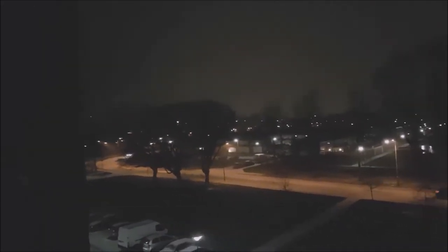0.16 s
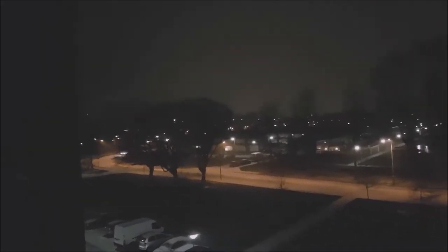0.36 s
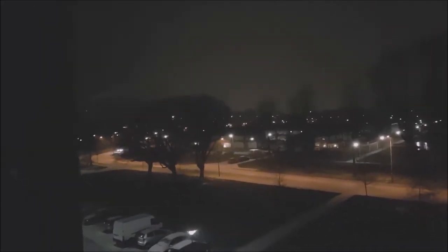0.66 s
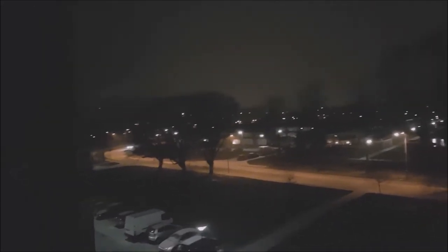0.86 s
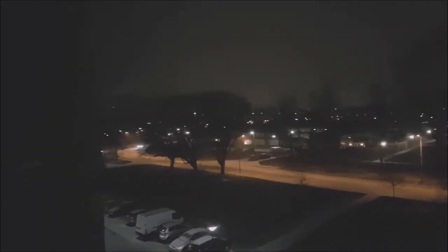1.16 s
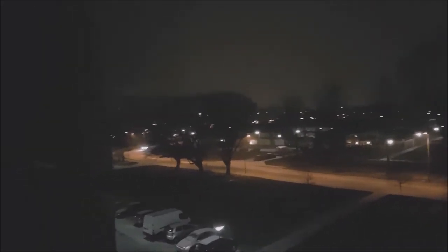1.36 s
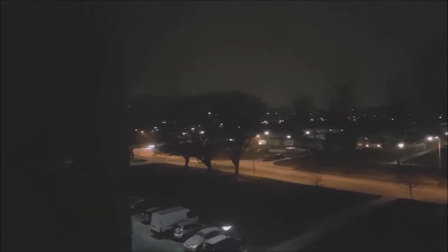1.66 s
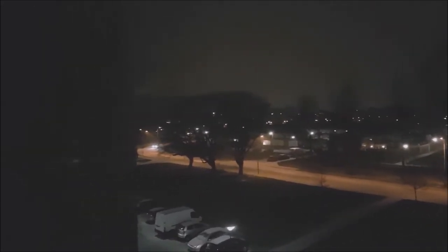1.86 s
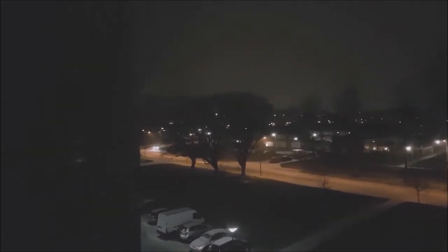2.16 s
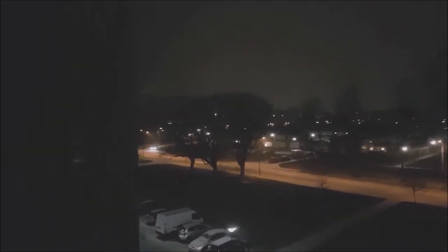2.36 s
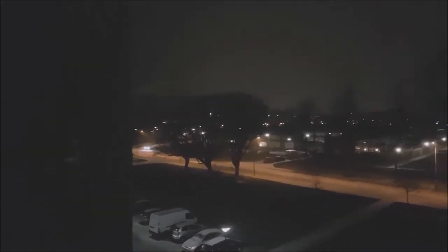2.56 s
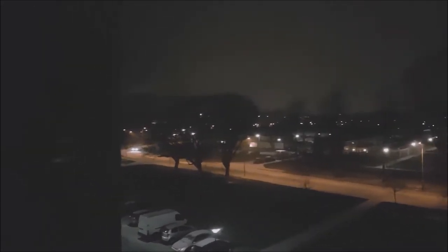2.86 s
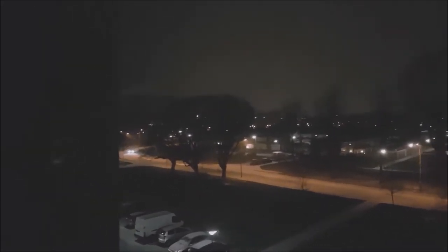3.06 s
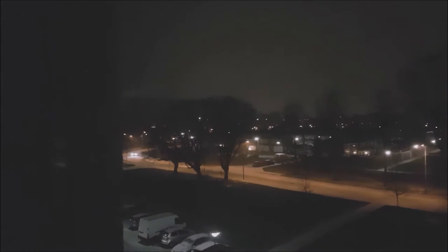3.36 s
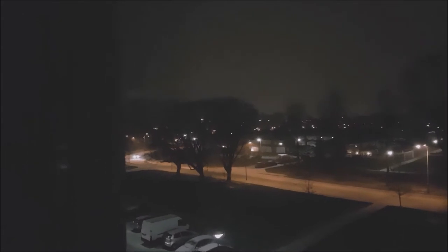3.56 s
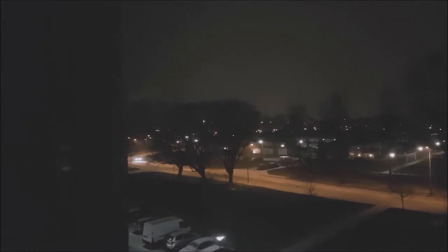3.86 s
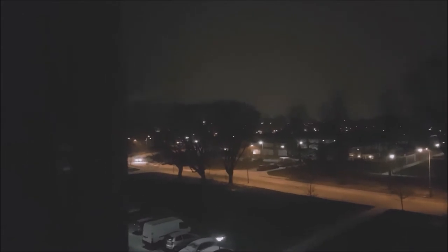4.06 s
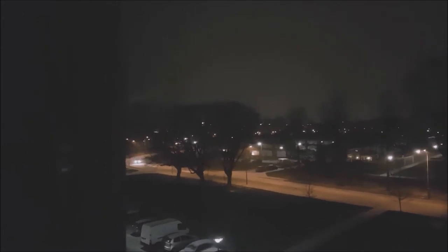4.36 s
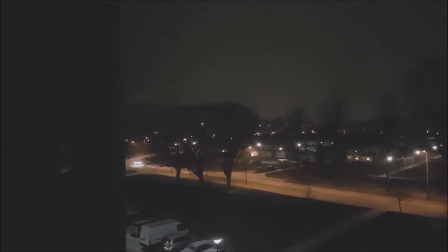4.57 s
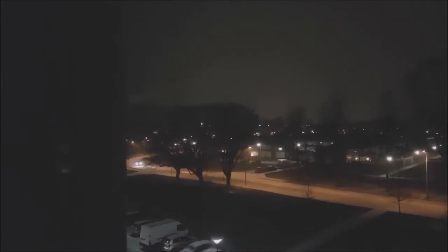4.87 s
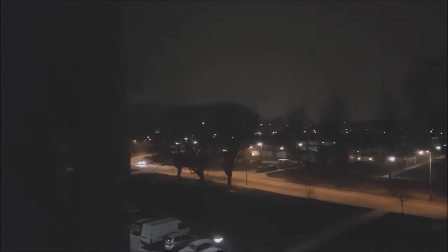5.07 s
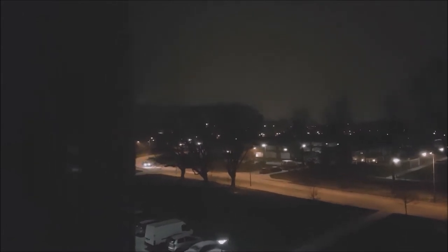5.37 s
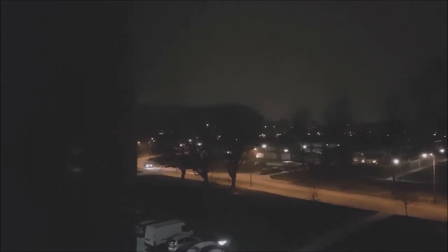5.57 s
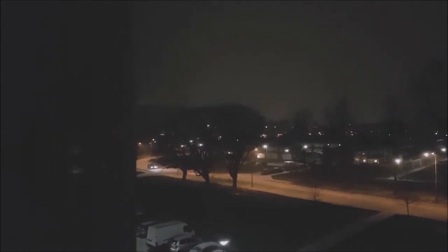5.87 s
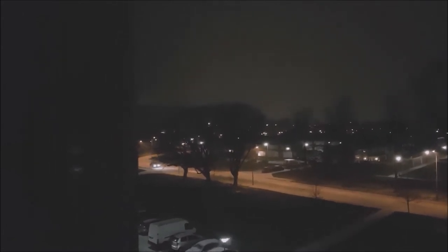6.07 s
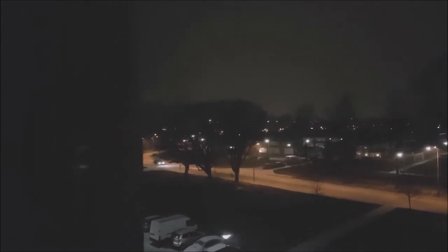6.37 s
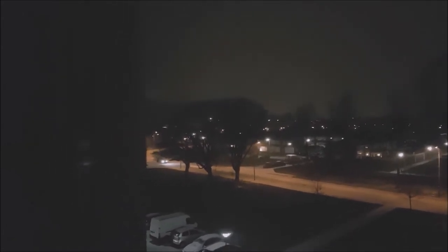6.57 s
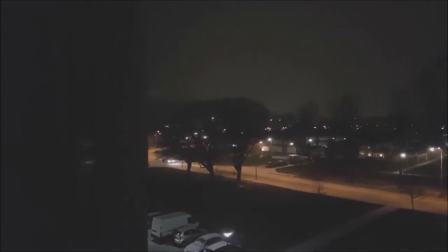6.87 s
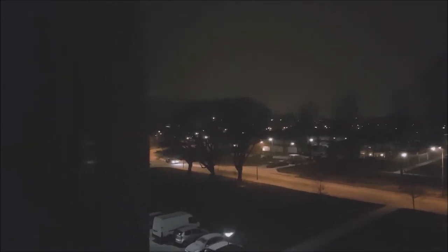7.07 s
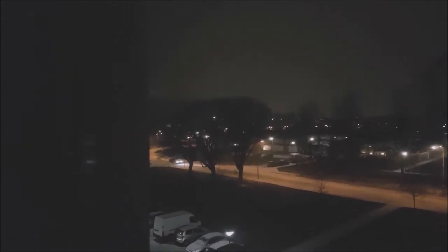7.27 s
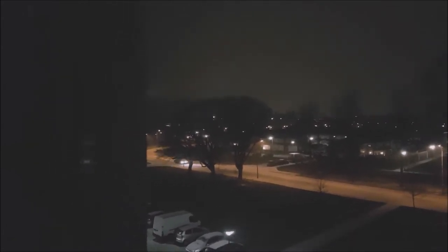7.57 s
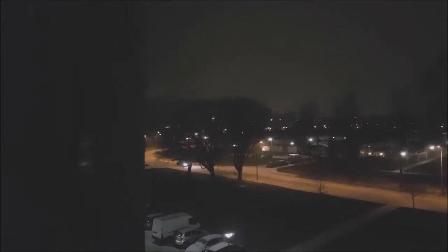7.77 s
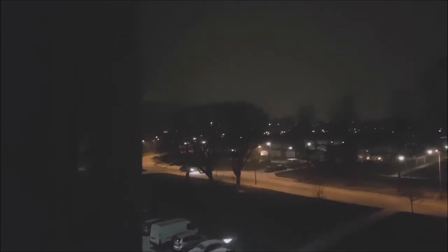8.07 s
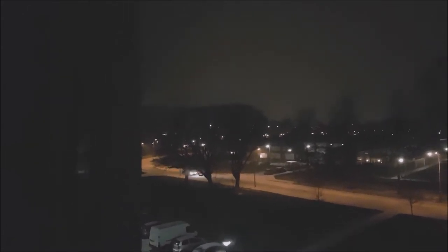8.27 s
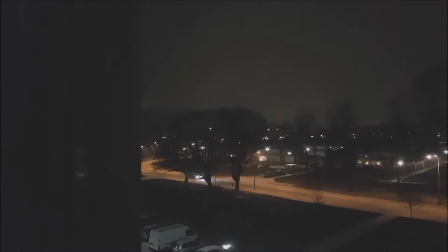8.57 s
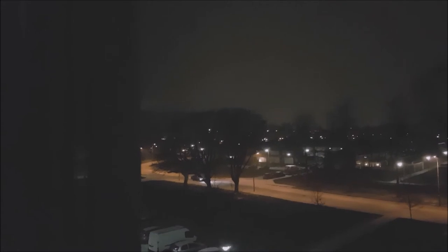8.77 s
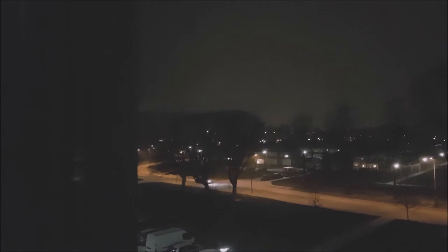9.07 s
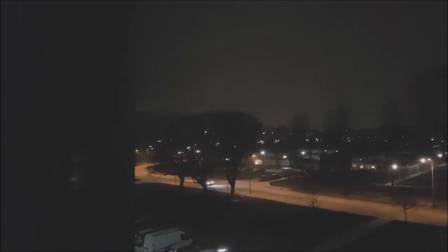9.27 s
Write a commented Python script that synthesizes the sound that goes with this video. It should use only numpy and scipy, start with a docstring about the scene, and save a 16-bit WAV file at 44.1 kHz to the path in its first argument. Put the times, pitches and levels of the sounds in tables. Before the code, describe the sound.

From a window at night, ripping thunder breaks into booming cracks and bright snaps, then rumbles away slowly with a late clap.

```python
"""Thunder over a town at night, heard from a window on a phone held in the hand.
A tearing lead-in opens into a loud peal that ends in sharp snaps, then a long roll with one late clap.
Swarms of shocks from the crooked lightning channel, single fronts and low thuds boom in the room.
Shaped noise makes the distant traffic, tyres and hiss underneath.
A finger muffles the right port throughout, with dull bumps in the first few seconds."""
import sys
import numpy as np
from scipy import signal
from scipy.fft import rfft, irfft, next_fast_len
from scipy.io import wavfile
from scipy.ndimage import uniform_filter1d, minimum_filter1d, map_coordinates

SR = 44100
rng = np.random.default_rng(int(sys.argv[2]) if len(sys.argv) > 2 else 0)


def master_out(mix):
    """Clip the mix to full scale and print it as 16-bit PCM to the path in sys.argv[1]."""
    frames = np.transpose(np.atleast_2d(mix))
    ceiling = np.clip(frames, -1, 1)
    pcm = np.round(ceiling * 32767).astype(np.int16)
    wavfile.write(sys.argv[1], SR, pcm)


N = 414981

# Spectrum tables list freq_hz, level_db (per hertz, relative: the sound is levelled afterwards).
# Distant traffic: spectrum
TRAFFIC_SPECTRUM = [(30, -9.5), (130, -1), (430, -0.5), (620, -11.5), (780, -10.5), (950, -8), (1450, -20),
                    (2000, -17), (2600, -26.5), (3500, -32), (4300, -35.5), (7000, -62), (12000, -59.5)]
# Tyres singing on the road: spectrum, then level over time: time_s, level_db
TYRE_SPECTRUM = [(1000, -30), (1600, -10.5), (1950, 7), (2250, -0.5), (2700, -15.5), (4500, -44.5)]
TYRE_LEVEL = [(0, -72), (4.3, -69), (5.8, -60.5), (7.7, -66), (7.9, -56.5), (8.4, -63), (8.9, -58),
              (9.22, -57), (9.41, -65)]
# Faint treble hiss: spectrum, then level over time: time_s, level_db
HISS_SPECTRUM = [(1000, -24), (2500, -8), (5000, 1.5), (7800, -4.5), (9000, -17), (16000, -28.5)]
HISS_LEVEL = [(0, -82), (2.1, -80), (2.3, -70), (3.4, -67), (4.9, -68), (6.3, -79), (9.41, -82)]
# Self-noise of the microphones: spectrum
MIC_SPECTRUM = [(100, 1), (3000, -1), (6000, -5), (9500, -13), (12500, -4), (15700, 0)]

# Finger shifting on the right port: start_s, thump_db, pitch_hz, tick_db
BUMPS = [(0.106, -25, 170, -38), (.176, -11, 150, -40), (.51, -9.5, 50.3, -41), (1.119, -14.5, 40, -53),
         (1.319, -22, 45, -59), (1.492, -11.5, 44.8, -47.5), (2.09, -17, 45, -57), (2.622, -19, 40, -69),
         (3.288, -17, 45, -68), (3.47, -20, 45, -63), (4.058, -14, 50.2, -71), (3.769, -12, 128, -41.5)]
# Finger grips, each held until the next: start_s, loss_db
GRIPS = [(0, 22), (.8, 27.5), (2.1, 24), (3.65, 17)]
REGRIP_S = 0.097  # time to slide into a new grip
# Tone of the covered port, where bass slips past the finger: freq_hz, gain_db
LEAK_TONE = [(30, 18.5), (60, 9), (110, 4.5), (200, 2), (380, -4.5), (1400, -3.5), (2500, 4), (6000, 4)]

# Scatter after each strong front: freq_hz, t60_s
SCATTER_DECAY = [(60, 0.32), (200, 0.21), (1000, 0.063), (3000, 0.17), (10000, 0.029)]
# Near walls: delay_s, gain (linear)
WALLS = [(.0096, 0.16), (.026, 0.27), (0.0427, .15)]
# Standing waves of the room: freq_hz, width_hz, level_db (over the direct sound)
ROOM_MODES = [(58.8, 3.7, 3.5), (118.3, 13, -8), (133.2, 11, -4), (198.5, 5.2, 5.5), (258.6, 7.6, 0.5)]

# Peals, one for each bend of the channel that is heard: start_s, hold_s, boom_db, tear_db
PEALS = [(0, 0.38, -42, -36.5), (0.423, 0.2, -35, -33), (0.839, 0.045, -24, -29),
         (0.904, 0.082, -24.5, -27.5), (1.132, 0.15, -14, -23), (1.316, 0.12, -14.5, -24),
         (1.523, 0.034, -15.5, -24), (1.607, 0.18, -15.5, -25), (1.866, 0.11, -20.5, -32),
         (2.037, 0.1, -16.5, -24.5), (2.214, 0.044, -17.5, -26.5), (2.424, 0.087, -29, -35),
         (2.86, 0.093, -39, -39.5), (2.97, 0.22, -32, -37), (3.267, 0.13, -29, -35),
         (3.513, 0.35, -38.5, -39.5), (3.77, 0.36, -33.5, -47), (4.175, 0.043, -37, -43),
         (4.43, 0.14, -31, -41), (4.739, 0.11, -33.5, -40), (4.952, 0.17, -42, -38.5),
         (5.651, 0.099, -29.5, -39.5), (5.788, 0.044, -31.5, -38.5), (5.97, 0.26, -36, -40.5),
         (6.186, 0.19, -36.5, -58), (6.91, 0.07, -31.5, -53), (7.076, 0.076, -25.5, -37),
         (7.214, 0.078, -31.5, -45), (7.315, 0.015, -29.5, -37), (7.832, 0.081, -35, -37.5),
         (8.183, 0.24, -38.5, -42), (9.211, 0.1, -36, -47)]
ATTACK_S = 0.04  # length of the rise, centred on start_s
BOOM_FALL_DB_PER_S, TEAR_FALL_DB_PER_S = 73.5, 74
# Steady rumble and tearing between the peals: start_db, fade_db_per_s
BOOM_BED = (-32.5, 0.87)
TEAR_BED = (-40.5, .9)
# Deep boom, near tearing and duller far tearing: spectra
BOOM_SPECTRUM = [(15, -54.5), (30, -37.5), (48, -8.5), (63, -1.5), (76, -3), (105, -2.5), (140, 0),
                 (170, -2), (200, -5.5), (250, -10.5), (310, -13.5), (450, -23.5), (650, -32.5),
                 (2000, -97)]
NEAR_TEAR_SPECTRUM = [(150, -16), (330, -1.5), (480, 2.5), (600, 1.5), (780, 3), (1000, 4), (1200, -2),
                      (1600, -8), (2150, -16.5), (2700, -35.5), (4000, -44.5), (6000, -70), (16000, -89)]
FAR_TEAR_SPECTRUM = [(120, -21), (290, 1.5), (480, 9), (600, -10.5), (750, -2), (1000, -22), (1600, -38),
                     (2700, -30), (8000, -96.5)]
# Later shocks come from farther up the channel, so the tearing turns dull
DULL_FROM_S, DULL_TIME_S = 0.57, 3.14  # onset and time constant

# Fronts so distant that only a round thud is left: start_s, level_db (envelope peak, before the room), pitch_hz
THUDS = [(0.811, -17, 149.4), (.922, -17, 176.5), (1.143, -8.5, 126), (1.197, -8, 107), (1.355, -11, 139.3),
         (1.66, -8, 106.6), (1.684, -4.5, 128), (2.066, -12, 153), (2.111, -8.5, 145), (2.261, -6, 134),
         (2.393, -15, 140), (2.496, -12.5, 124), (2.538, -12, 129.5), (2.95, -20, 146), (3.071, -17.5, 180),
         (3.294, -17.5, 111), (3.338, -20.5, 146), (4.059, -24, 191), (4.078, -18, 264),
         (4.222, -16.5, 187), (4.456, -32, 156), (5.293, -25, 213), (5.686, -29, 111), (5.831, -17, 176),
         (5.869, -16.5, 178), (6.129, -22.5, 145), (6.34, -24, 116), (7.02, -15.5, 116), (7.073, -18, 182),
         (7.338, -15, 117), (7.713, -25.5, 124), (8.431, -27.5, 139), (9.305, -30.5, 156)]
THUD_SWELL_S = 0.005
# Single strong fronts: start_s, level_db (left peak before the room), pitch_hz (low when blunt and far)
CLAPS = [(0.103, -18.5, 950), (.404, -16, 1030), (.563, -18, 887), (0.636, -15.5, 1010),
         (0.716, -12.5, 870), (0.815, -9, 845), (.883, -14.5, 890), (1.138, -7.5, 1237), (1.157, -21, 1440),
         (1.188, -7.5, 895), (1.225, -8.5, 740), (1.322, -2.5, 1086), (1.344, -15, 1360),
         (1.405, -11.5, 1230), (1.558, -19.5, 1237), (1.595, -6.5, 950), (1.616, -13.5, 1460),
         (1.653, -14, 1260), (1.767, -5.5, 763), (1.881, -15, 700), (2.066, -10.5, 1034), (2.122, -6, 590),
         (2.1638, -6.5, 480), (2.26, -2.5, 1230), (2.852, -23, 864), (3.193, -18.5, 726),
         (3.294, -11.5, 550), (3.379, -17, 790), (3.499, -19, 507), (3.686, -24, 556), (3.891, -18, 724),
         (3.989, -18.5, 660), (4.056, -17.5, 720), (4.602, -28, 476), (4.952, -24, 900), (5.46, -21, 517),
         (5.637, -26.5, 554), (5.841, -24.5, 410), (6.234, -28, 400), (6.354, -25.5, 513), (6.39, -22, 486),
         (6.45, -27, 480), (6.903, -19, 462), (7.0696, -8, 940), (7.08, -16, 1100), (7.101, -22, 1130),
         (7.888, -19.5, 410), (8.84, -27.5, 413), (9.304, -21, 344)]
# Fixed bass of a strong front: freq_hz, level_db
FRONT_BASS = [(25, -22), (55, -7), (95, 0)]
# Top of a strong front, which moves with its pitch: pitch_multiple (ratio), level_db
FRONT_TOP = [(.45, 1.5), (.7, -2.5), (1, 3), (1.35, -8.5), (2.1, -18.5), (2.8, -34.5), (4, -52.5),
             (6, -69.5), (15, -88.5)]
# Crackle bursts as the sharpest fronts splinter: start_s, level_db (at the start)
SPLINTERS = [(1.139, -41), (1.157, -41.5), (1.322, -42), (1.343, -38.5), (1.406, -37), (1.613, -31),
             (1.651, -42.5), (2.259, -35)]
SPLINTER_FALL_DB_PER_S = 478
# Splinter crackle: spectrum
SPLINTER_SPECTRUM = [(600, -31.5), (1400, -7), (2100, 9.5), (2800, -9), (4200, -18.5), (5000, -34),
                     (9000, -49.5)]
# Dry snaps close by: start_s, level_db, pitch_hz
SNAPS = [(1.225, -25, 3240), (2.077, -33.5, 2970), (2.15, -25.5, 3010), (2.161, -29.5, 3240),
         (2.1657, -20.5, 2720), (2.1909, 0, 2250), (2.206, 4.5, 2130), (2.2069, -4.5, 6800),
         (2.2153, -12.5, 9070), (2.233, -28, 7030)]
# What the snaps leave ringing: spectrum
SNAP_RING_SPECTRUM = [(600, -21), (1500, 2.5), (2200, 2.5), (3100, -2.5), (4200, -30.5), (7500, -18),
                      (10000, -30.5), (16000, -37.5)]
# Flurries of fine crackle around the snaps: peak_s, level_db (at the peak)
FLURRIES = [(2.164, -32.5), (2.206, -47)]
FLURRY_RISE_DB_PER_S, FLURRY_FALL_DB_PER_S = 745, 1400
# Flurry crackle: spectrum
SPARK_SPECTRUM = [(500, -32.5), (1400, -1.5), (2200, 6), (3200, -3), (4300, -4.5), (7000, -12),
                  (9000, -34.5), (16000, -38)]
# Band limit of the phone, in hertz
TOP_HZ = 15850


def amp(db):
    """Decibels to linear gain."""
    return 10 ** (np.asarray(db) / 20)


def unit(x):
    """Scale a sound to an rms of 1."""
    return x / np.sqrt(np.mean(x ** 2) + 1e-20)


def along(points, hz):
    """Read (Hz, value) points along a log frequency axis."""
    point_hz, values = np.transpose(points)
    return np.interp(np.log(hz + 1), np.log(point_hz + 1), values)


def level_curve(points):
    """Draw straight lines through (s, dB) points, one value per sample."""
    times, levels = np.transpose(points)
    return np.interp(np.arange(N) / SR, times, levels)


def wobble(rate_hz):
    """A smooth random curve with rate_hz knots a second."""
    knots = rng.standard_normal(int(N * rate_hz / SR) + 4)
    return map_coordinates(knots, [np.arange(N) * rate_hz / SR])


def coloured(x, spectrum):
    """Causal minimum-phase filter through (Hz, dB) points, built by folding the cepstrum."""
    n = x.shape[-1]
    m = 2 * next_fast_len(n // 2 + SR // 8)
    gain = amp(along(spectrum, np.fft.rfftfreq(m, 1 / SR)))
    cepstrum = irfft(np.log(gain))
    cepstrum[1:m // 2] *= 2
    cepstrum[m // 2 + 1:] = 0
    response = np.exp(rfft(cepstrum))
    return irfft(rfft(x, m) * response, m)[..., :n]


def noise(spectrum):
    """Coloured noise of rms 1, unrelated in the two channels."""
    return unit(coloured(rng.standard_normal((2, N)), spectrum))


def add(track, s, sound):
    """Mix a sound in at time s."""
    part = track[..., max(round(s * SR), 0):][..., :sound.shape[-1]]
    part += sound[..., :part.shape[-1]]


def town(waver_db=-1.5):
    """Steady distant traffic, the wavering song of tyres and a faint hiss that swells and sinks."""
    traffic = amp(-41.0) * noise(TRAFFIC_SPECTRUM)
    tyre_gain = amp(level_curve(TYRE_LEVEL) + waver_db * wobble(2.3))
    tyres = tyre_gain * noise(TYRE_SPECTRUM)
    hiss = amp(level_curve(HISS_LEVEL)) * noise(HISS_SPECTRUM)
    return traffic + tyres + hiss


def finger(life_cycles=0.53, settle_db_per_s=1.4, flutter_db=-39, waver_db=2.0):
    """Dull bumps with a tick of skin contact, and a low flutter that calms as the hand settles."""
    out, t = np.zeros(N), np.arange(SR // 5) / SR
    tick_spectrum = [(1000, 23), (3500, 7.5), (6000, -7.5), (15000, -21)]
    for s, thump_db, hz, tick_db in BUMPS:
        thump = np.sin(2 * np.pi * hz * t) * np.exp(-hz * t / life_cycles)
        burst = rng.standard_normal(len(t)) * amp(-60 * t / 0.0075)  # t60 7.5 ms
        tick = coloured(burst, tick_spectrum)
        add(out, s, amp(thump_db) * thump + amp(tick_db) * tick)
    flutter = noise([(10, -14.5), (25, -6.0), (55, 2.0), (120, -15.0), (500, -37.5), (3000, -90.5)])[1]
    settling_db = flutter_db - settle_db_per_s * np.arange(N) / SR
    return out + flutter * amp(settling_db + waver_db * wobble(3.9))


def seal():
    """Gain of the covered port as the finger slides from grip to grip."""
    starts, loss_db = np.transpose(GRIPS)
    held = loss_db[np.searchsorted(starts[1:], np.arange(N) / SR)]
    return amp(-uniform_filter1d(held, size=max(round(REGRIP_S * SR), 1)))


def room(x):
    """Near walls repeat every shock, and a few standing waves ring on."""
    m = next_fast_len(N + SR // 2)
    f = np.fft.rfftfreq(m, 1 / SR)
    echoes = sum(gain * np.exp(-2j * np.pi * f * delay) for delay, gain in WALLS)
    ring = sum(amp(db) * 1j * f * width / (hz * hz - f * f + 1j * f * width)
               for hz, width, db in ROOM_MODES)
    return irfft(rfft(x, m) * (1 + echoes + ring), m)[:, :N]


def swarm(spectrum, rate_hz, spread_db, wash_db):
    """Small shocks at random times and sizes, over the diffuse wash of their echoes; rms 1."""
    sizes = rng.choice([-1, 1], N) * amp(spread_db * rng.uniform(-0.36, 1, N))
    shocks = unit(sizes * (rng.random(N) < rate_hz / SR))
    wash = amp(wash_db) * rng.standard_normal((2, N))
    return unit(coloured(shocks + wash, spectrum))


def swell(s, hold_s, fall_db_per_s):
    """Gain of one peal: a quick rise, a hold, then a steady fall in dB."""
    t = np.arange(N) / SR - s
    rise = np.clip(t / ATTACK_S + .5, 0, 1)
    return rise * amp(-fall_db_per_s * np.maximum(t - hold_s, 0))


def strength(bed, peals, fall_db_per_s):
    """Gain in which the fading bed and the (s, hold s, dB) peals add up in power."""
    start_db, fade_db_per_s = bed
    bed_power = amp(start_db - fade_db_per_s * np.arange(N) / SR) ** 2
    peal_power = sum((amp(db) * swell(s, hold_s, fall_db_per_s)) ** 2 for s, hold_s, db in peals)
    return np.sqrt(bed_power + peal_power)


def roll(surge_db=1.63):
    """Deep boom and tearing surge together as bends of the channel are heard in turn."""
    boom_peals = [(s, hold, db) for s, hold, db, _ in PEALS]
    tear_peals = [(s, hold, db) for s, hold, _, db in PEALS]
    boom_gain = strength(BOOM_BED, boom_peals, BOOM_FALL_DB_PER_S)
    tear_gain = strength(TEAR_BED, tear_peals, TEAR_FALL_DB_PER_S)
    boom = swarm(BOOM_SPECTRUM, rate_hz=330, spread_db=4, wash_db=-0.5)
    near = swarm(NEAR_TEAR_SPECTRUM, rate_hz=200, spread_db=6, wash_db=0)
    far = swarm(FAR_TEAR_SPECTRUM, rate_hz=140, spread_db=12.5, wash_db=-1)
    # equal-power crossfade from near to far
    near_share = np.exp(-np.maximum(np.arange(N) / SR - DULL_FROM_S, 0) / DULL_TIME_S)
    tear = np.sqrt(near_share) * near + np.sqrt(1 - near_share) * far
    return boom_gain * boom + tear_gain * amp(surge_db * wobble(17)) * tear


def thuds():
    """Each distant front is a few low cycles that swell and sink."""
    out, t = np.zeros((2, N)), np.arange(SR // 8) / SR
    shape = t / THUD_SWELL_S * np.exp(1 - t / THUD_SWELL_S)
    for s, db, hz in THUDS:
        add(out, s, amp(db) * np.sin(2 * np.pi * hz * t) * shape)
    return out


def arrival(wet_db):
    """One shock at both ports: the direct spike, then a fresh scatter from facades and walls."""
    hz, t, z = signal.stft(rng.standard_normal((2, SR // 3)), SR, nperseg=256)
    decay = amp(-60 * t / along(SCATTER_DECAY, hz)[:, None])
    shock = signal.istft(z * decay, SR, nperseg=256)[1]
    shock *= amp(wet_db) / np.linalg.norm(shock[0])
    shock[:, 0] += 1  # the direct spike
    return shock


def claps():
    """Each strong front is a pressure spike with a clatter of echoes; the air has blunted the far ones."""
    out = np.zeros((2, N))
    for s, db, hz in CLAPS:
        top = [(multiple * hz, level) for multiple, level in FRONT_TOP]
        front = coloured(arrival(wet_db=0), FRONT_BASS + top)
        add(out, s, amp(db) * front / np.abs(front[0]).max())
    return out


def splinters():
    """Fine crackle that starts with a sharp front and dies quickly."""
    gain, t = np.zeros(N), np.arange(SR // 4) / SR
    for s, db in SPLINTERS:
        add(gain, s, amp(db - SPLINTER_FALL_DB_PER_S * t))
    return gain * swarm(SPLINTER_SPECTRUM, rate_hz=720, spread_db=10, wash_db=0)


def flurries():
    """Gain of the fine crackle: each flurry gathers to its peak and stops more quickly."""
    t = np.arange(N) / SR
    gain = np.zeros(N)
    for s, db in FLURRIES:
        drop_db = np.maximum(FLURRY_RISE_DB_PER_S * (s - t), FLURRY_FALL_DB_PER_S * (t - s))
        gain += amp(db - drop_db)
    return gain


def snaps(life_cycles=0.94, ring_db=-29, ring_t60_s=0.079):
    """Very short bright snaps of a cycle or two, each with fizz and a faint ring, amid fine crackle."""
    out = flurries() * swarm(SPARK_SPECTRUM, rate_hz=600, spread_db=7, wash_db=-4)
    t = np.arange(SR // 8) / SR
    for s, db, hz in SNAPS:
        snap = np.sin(2 * np.pi * hz * t) * np.exp(-hz * t / life_cycles)
        burst = rng.standard_normal(len(t)) * amp(-60 * t / 0.003)  # t60 3 ms
        fizz = 0.22 * coloured(burst, [(7500, 0), (11000, -9)])
        ring = unit(coloured(rng.standard_normal((2, len(t))), SNAP_RING_SPECTRUM))
        ring *= amp(ring_db - 60 * t / ring_t60_s)
        add(out, s, amp(db) * (snap + fizz + ring))
    return out


def scene():
    """The left port hears the storm freely; the right one hears it through the finger."""
    thunder = room(roll() + thuds() + claps() + splinters())
    left, other = thunder + snaps() + town()
    shared = np.pad(left, (round(0.0003 * SR), 0))[:N]  # left sound reaches the right port 0.3 ms later
    right = seal() * coloured(0.49 * shared + 1.1 * other, LEAK_TONE) + finger()
    self_noise = amp(-67) * noise(MIC_SPECTRUM)
    return np.array([left, right]) + self_noise


def record(dry):
    """The phone's fast limiter tames the peaks, then everything from the band limit up is cut."""
    needed = 1 / np.maximum(np.abs(dry) / .97, 1)
    gain = uniform_filter1d(minimum_filter1d(needed, size=161), size=161)
    m = next_fast_len(N + SR // 2)
    passband = np.fft.rfftfreq(m, 1 / SR) < TOP_HZ
    return irfft(rfft(dry * gain, m) * passband, m)[:, :N]


dry = scene()
out = record(dry)
master_out(out)
```